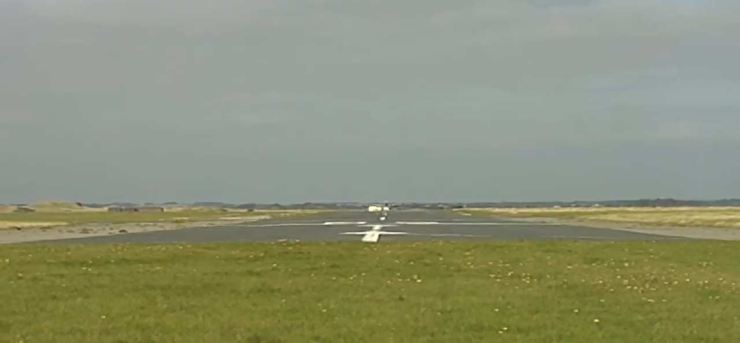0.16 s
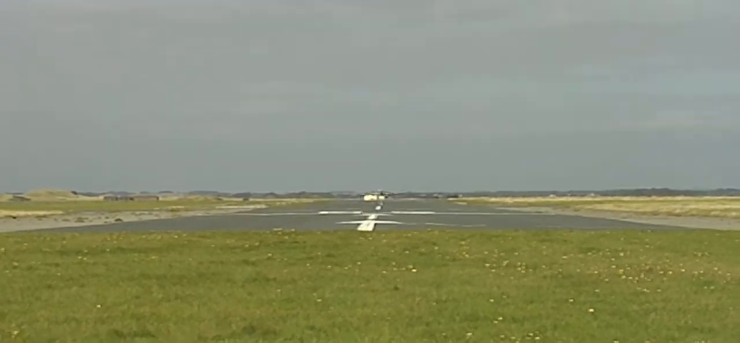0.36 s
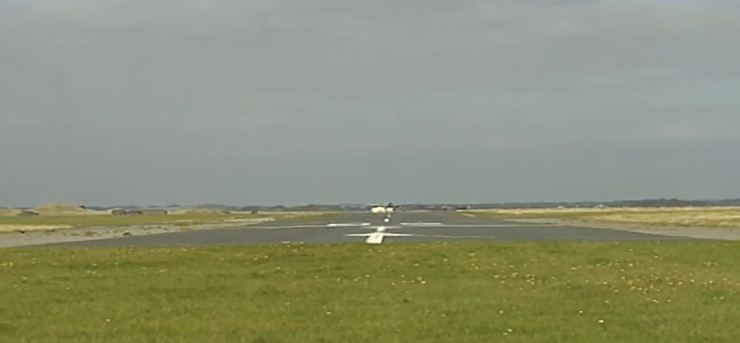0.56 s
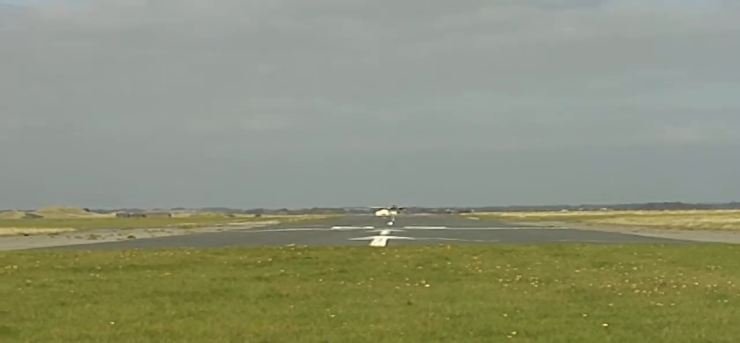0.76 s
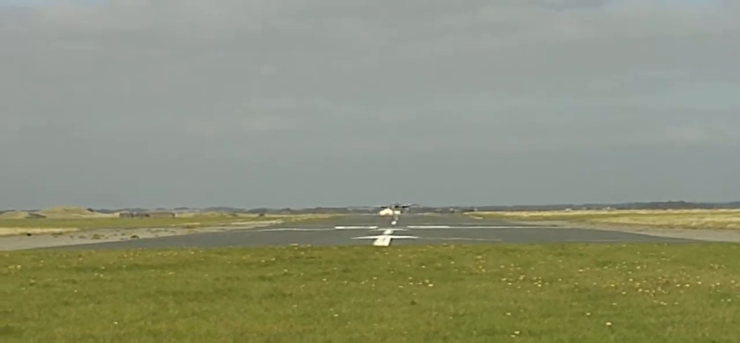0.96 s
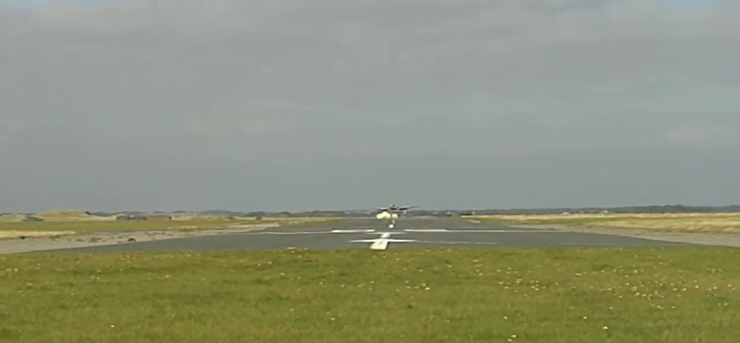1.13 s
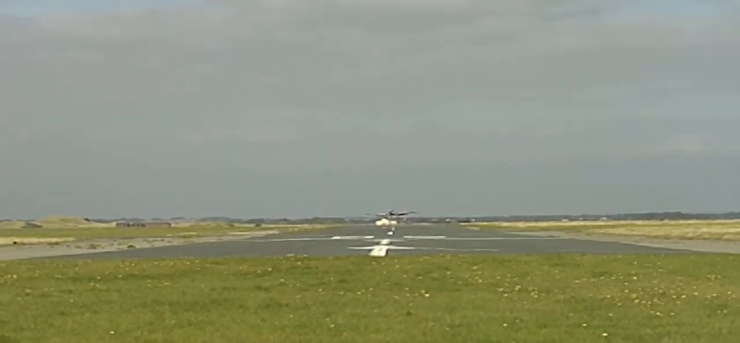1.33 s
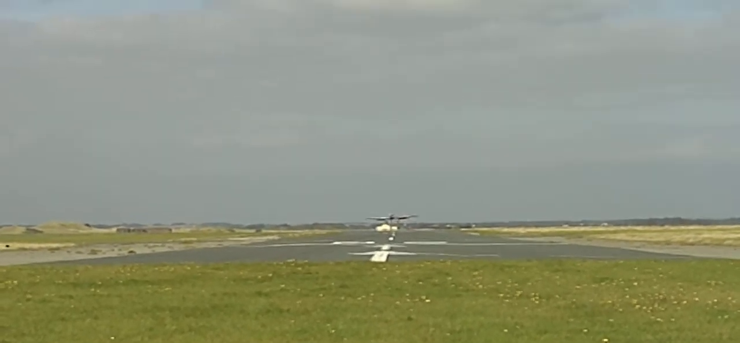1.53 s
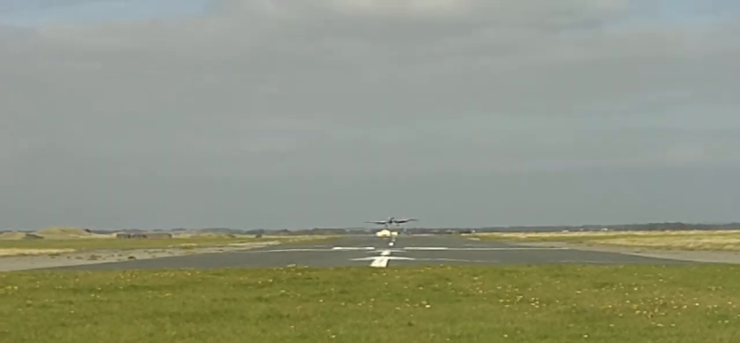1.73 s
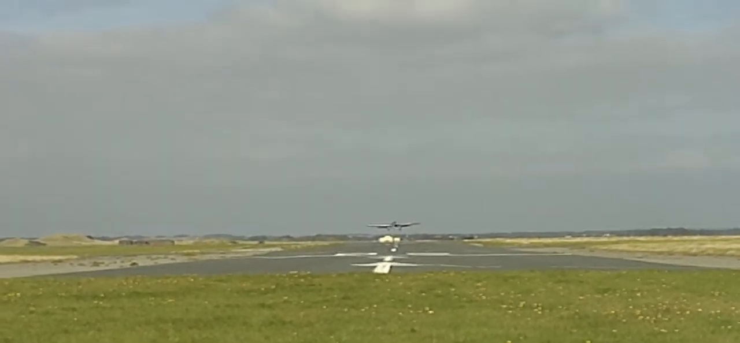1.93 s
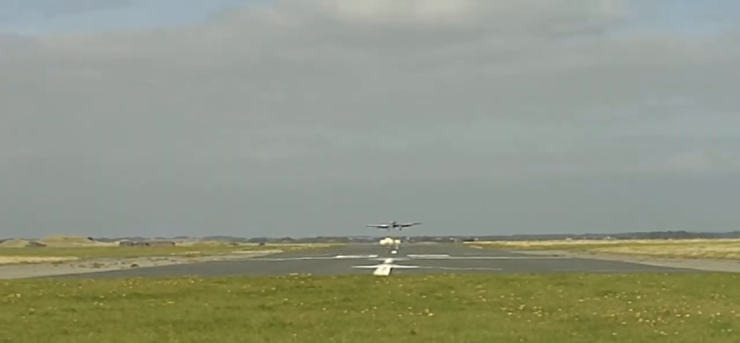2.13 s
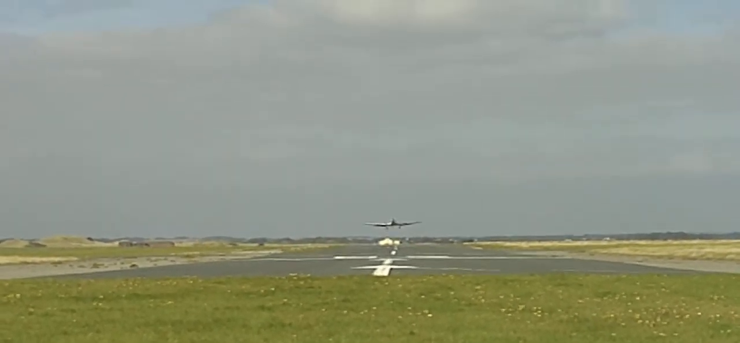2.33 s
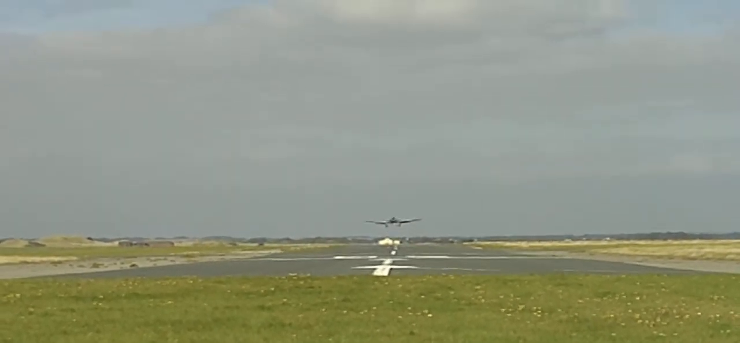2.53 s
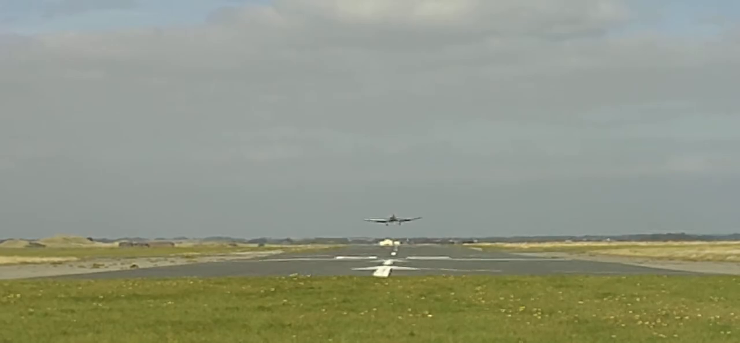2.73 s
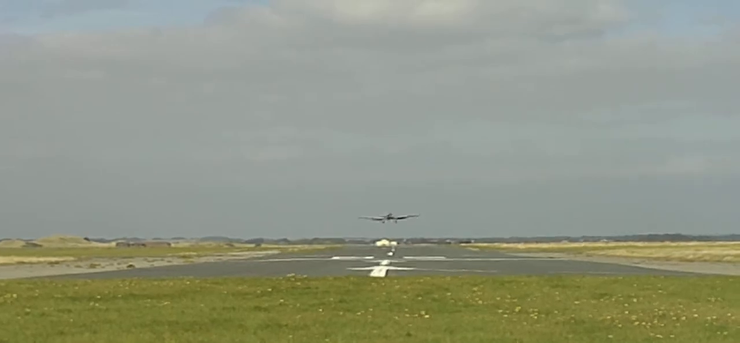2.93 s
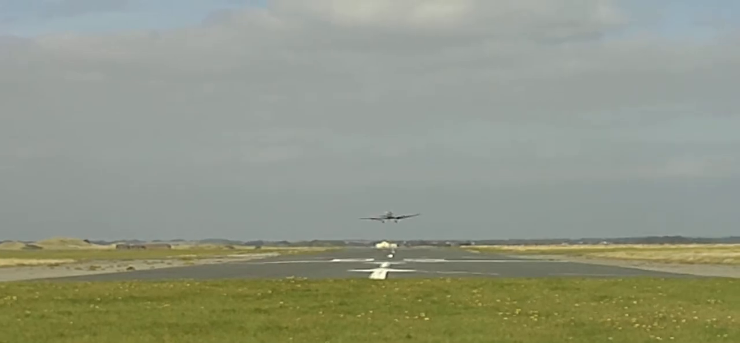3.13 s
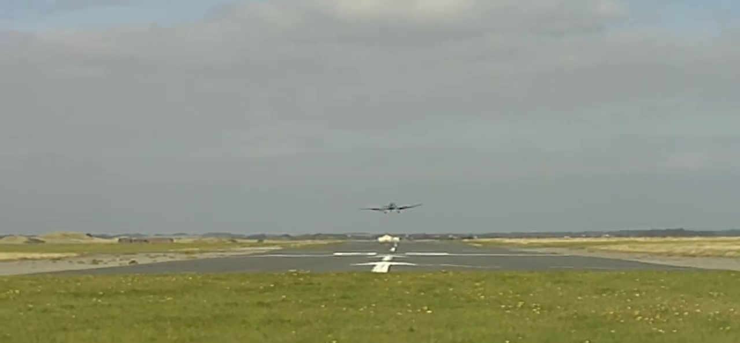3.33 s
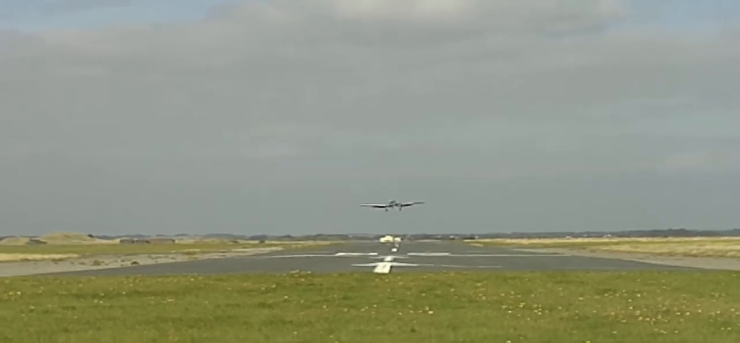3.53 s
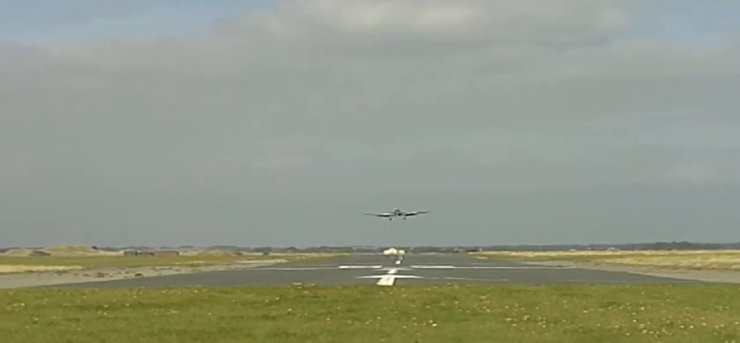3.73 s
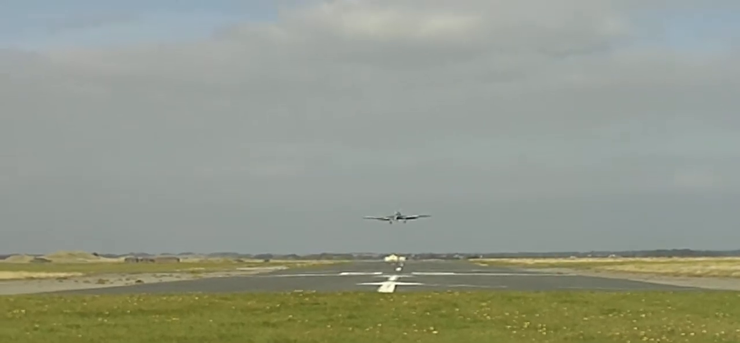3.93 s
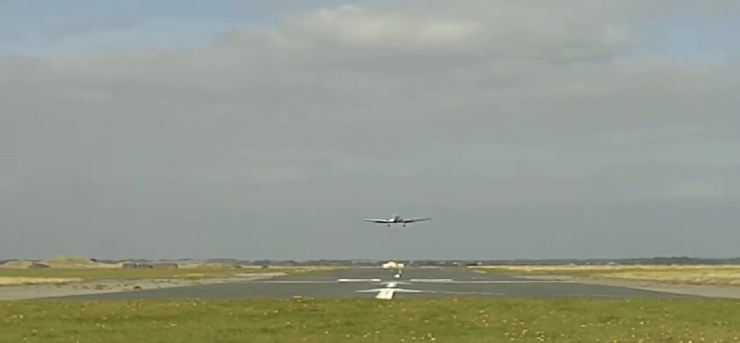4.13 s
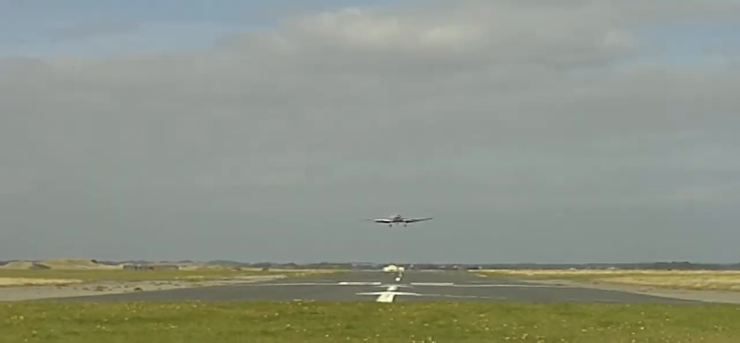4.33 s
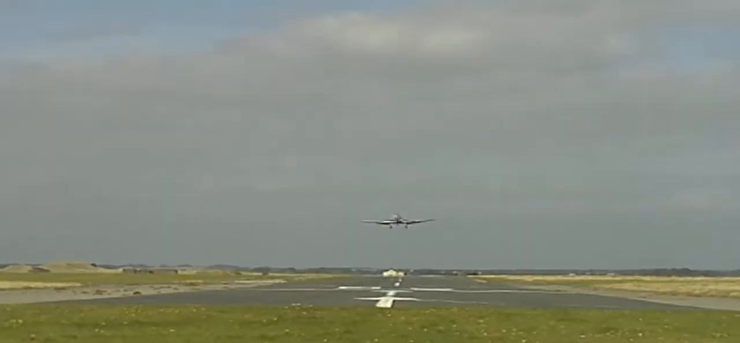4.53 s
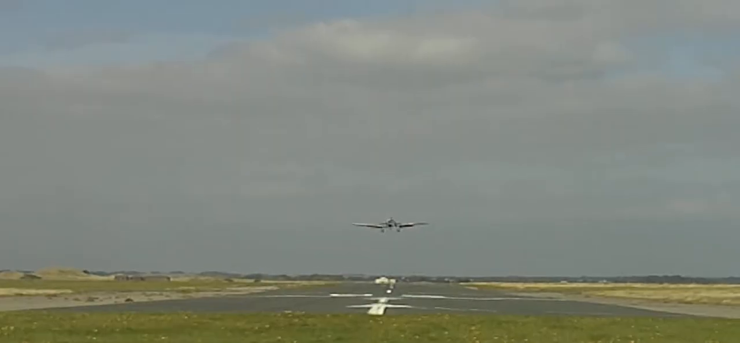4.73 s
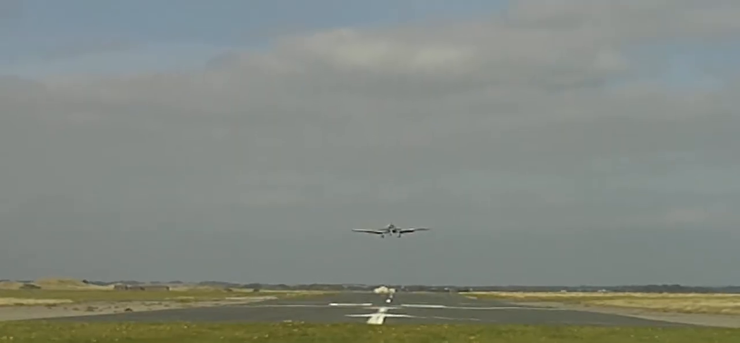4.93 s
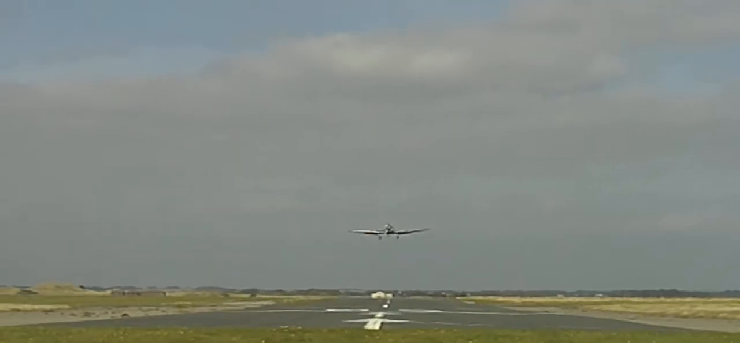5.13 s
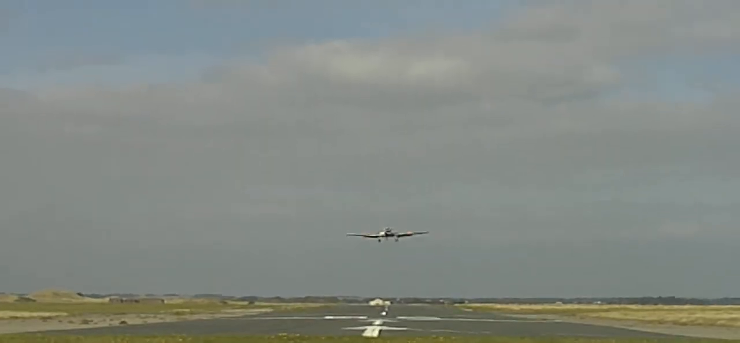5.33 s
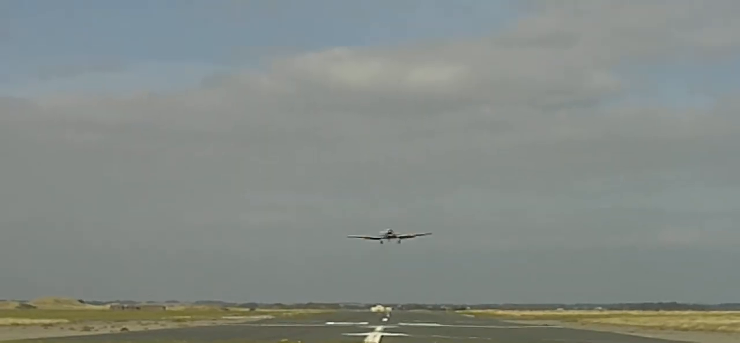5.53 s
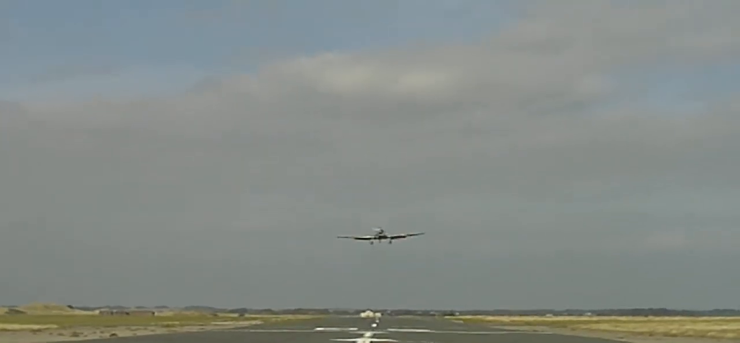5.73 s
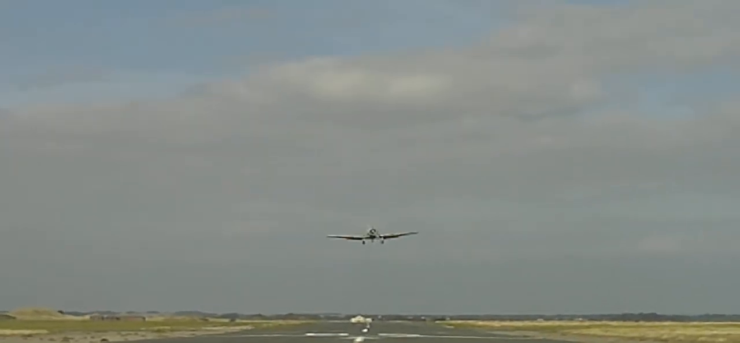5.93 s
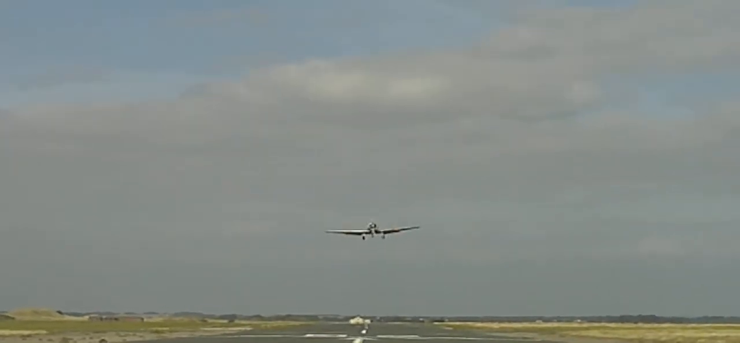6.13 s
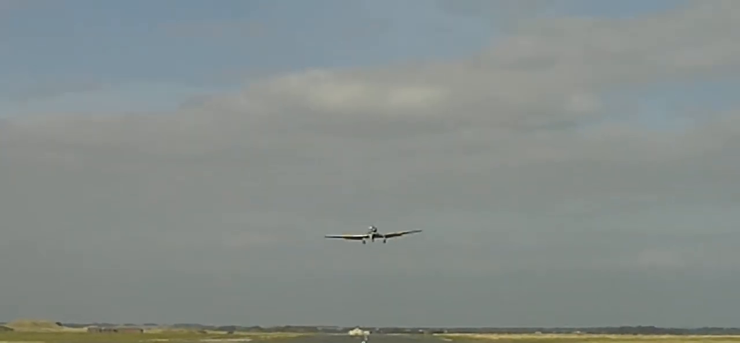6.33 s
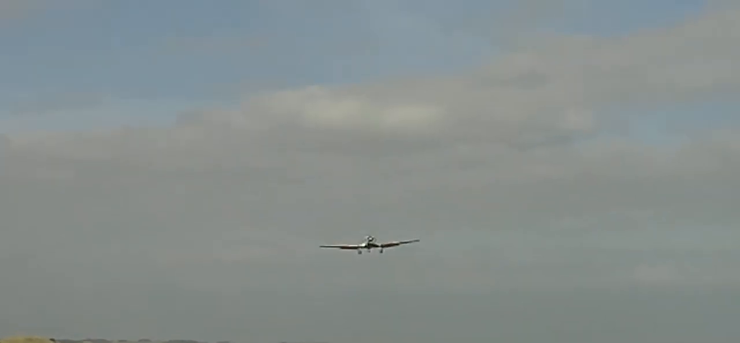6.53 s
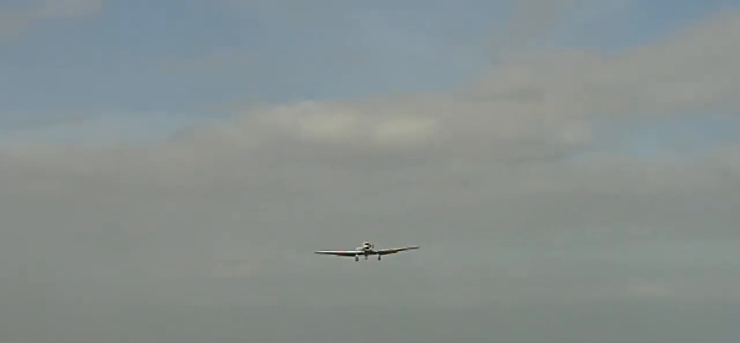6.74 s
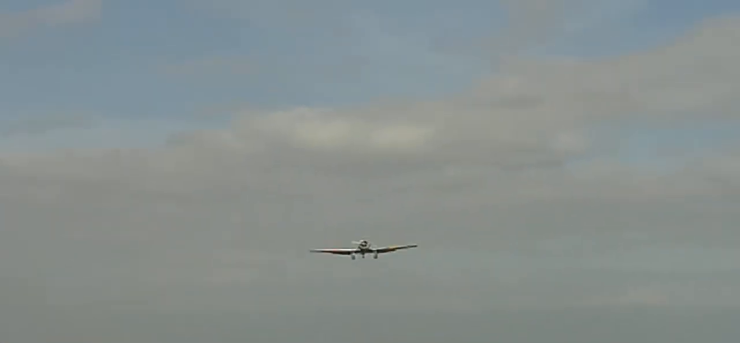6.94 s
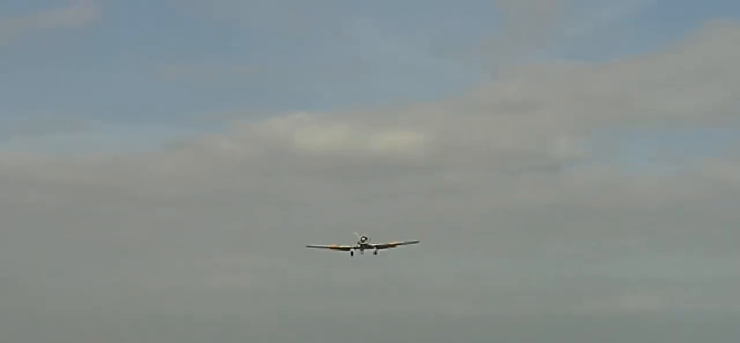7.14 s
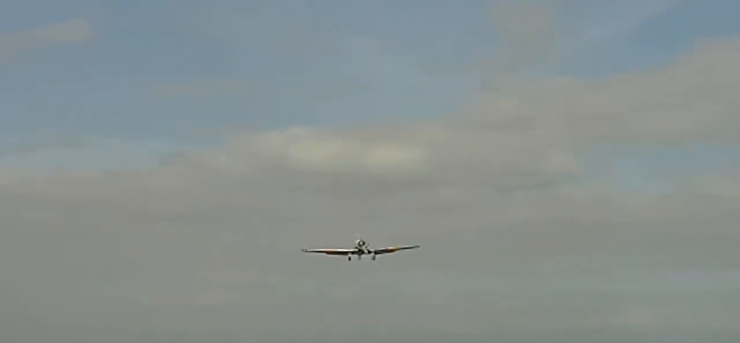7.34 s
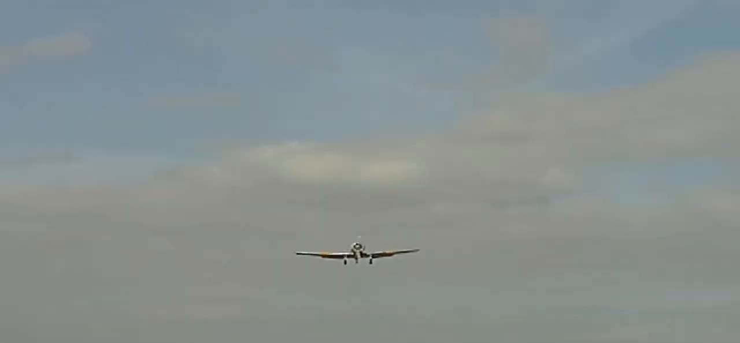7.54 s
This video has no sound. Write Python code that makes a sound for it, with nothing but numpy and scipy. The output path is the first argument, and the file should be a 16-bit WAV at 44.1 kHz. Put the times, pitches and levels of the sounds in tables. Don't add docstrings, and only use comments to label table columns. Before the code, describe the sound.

A propeller aircraft's low, buzzing radial-engine roar swells steadily from distant drone to overloaded close thunder, with light wind and a few camera handling knocks.

```python
import sys
import numpy as np
from scipy import signal
from scipy.fft import rfft, irfft, next_fast_len
from scipy.io import wavfile
from scipy.ndimage import uniform_filter1d

SR = 44100
rng = np.random.default_rng(int(sys.argv[2]) if len(sys.argv) > 2 else 0)


def decibels_to_gain(level_db):
    exponent = np.asarray(level_db, float) / 20
    return 10 ** exponent


def file_out(sig):
    cols = np.atleast_2d(sig).T
    lim = np.clip(cols, -1, 1)
    pcm = np.round(lim * 32767).astype(np.int16)
    wavfile.write(sys.argv[1], SR, pcm)


N = 338247
STEP = 100
CONTROL_S = np.arange(N // STEP + 2) * STEP / SR


def in_time(rows):
    s, *columns = np.transpose(rows)
    return np.array([np.interp(CONTROL_S, s, column) for column in columns])


def at_samples(control):
    return np.interp(np.arange(N) / STEP, np.arange(len(control)), control)


def rms_one(x):
    return x / np.sqrt(np.mean(x ** 2) + 1e-20)


def drift(rate_hz):
    r = np.exp(-2 * np.pi * STEP * rate_hz / SR)
    settle = 1000
    noise = rng.standard_normal(len(CONTROL_S) + settle)
    return rms_one(signal.lfilter([1], [1, -2 * r, r * r], noise)[settle:])


def fades(rows):
    s, half_s, depth_db = np.transpose(rows)
    bells = np.exp(-((CONTROL_S[:, None] - s) / half_s) ** 2)
    return -bells @ depth_db


def between(curves, centres_hz, hz):
    place = np.interp(np.log(hz), np.log(centres_hz), np.arange(len(curves)))
    low = min(int(place), len(curves) - 2)
    return curves[low] + (place - low) * (curves[low + 1] - curves[low])


def noise_bands(colour, count=18):
    size = next_fast_len(N)
    log_hz = np.log(np.arange(size // 2 + 1) * SR / size + 1)
    hz, db = np.transpose(colour)
    shaped = rfft(rng.standard_normal(size)) * decibels_to_gain(np.interp(log_hz, np.log(hz), db))
    shaped *= log_hz > np.log(hz[0]) - 0.3
    shaped /= np.sqrt(np.mean(irfft(shaped, size) ** 2))
    centres = np.geomspace(hz[0], hz[-1], count)
    bands = []
    for centre, one in zip(centres, np.eye(count)):
        window = np.interp(log_hz, np.log(centres), one)
        bands.append((centre, irfft(shaped * window, size)[:N]))
    return bands


def lines(turns, orders, levels_db, starts, curves, centres_hz, flutter_db, wander):
    base_hz = turns[-1] * SR / N
    turns = turns[::10]
    place = np.arange(len(turns)) * 10 / STEP
    out = 0
    for order, level_db, start in zip(orders, levels_db, starts):
        hz = order * base_hz
        shake = 0.16 + (hz / 900) ** 0.5
        gain = decibels_to_gain(level_db + between(curves, centres_hz, hz) + flutter_db * shake * drift(5.0))
        slip = wander * shake * drift(4.3)
        gain, slip = [np.interp(place, np.arange(len(c)), c) for c in (gain, slip)]
        out = out + np.sqrt(2) * gain * np.cos(2 * np.pi * (order * turns + start) + slip)
    return signal.resample_poly(out, 10, 1)[:N]


# time in seconds, buffeting level in dB.
WIND = [
    (0.0, -25.5),
    (0.5, -29.5),
    (1.1, -35.5),
    (1.4, -46),
    (1.96, -35),
    (2.5, -37.5),
    (3.0, -34.5),
]
# frequency in Hz, level in dB per Hz.
FIELD = [(300, -8), (470, -10), (650, -13.5), (900, -5.5), (1440, -17), (1710, -16), (4500, -23),
         (7200, -38)]


def wind():
    port = signal.butter(3, [90, 200], "band", fs=SR, output="sos")
    buffet = rms_one(signal.sosfilt(port, rng.standard_normal(N)))
    lumps = decibels_to_gain(in_time(WIND)[0] - 0.5 + 3.0 * drift(7.2))
    hiss = sum(band * at_samples(decibels_to_gain(0.71 * drift(3.0))) for hz, band in noise_bands(FIELD, count=5))
    return buffet * at_samples(lumps) + decibels_to_gain(-41) * hiss


# start in seconds, hollow knock level in dB, bright snap level in dB.
TICKS = [
    (.058, -26, -46),
    (.277, -27, -44),
    (.3483, -30, -21),
    (.3652, -17, -48),
    (1.368, -23, -39),
    (3.0483, -5, -32),
    (3.329, -17, -41),
    (3.431, -15, -41),
    (3.836, -24, -44),
    (3.8503, -12, -25),
]
# frequency in Hz, level in dB, 60 dB decay in seconds.
HOUSING = [
    (933, 8, 0.0086),
    (1340, -3.5, .01),
    (2040, -0.5, 0.0066),
]
# frequency in Hz, level in dB.
LATCH = [(2700, -10), (3100, 2), (4000, -5), (5500, -3), (7200, -9)]


def ticks():
    at, knock_db, snap_db = np.transpose(TICKS)
    blows, snaps = np.zeros((2, N)) + 1e-18
    blows[(at * SR).astype(int)] = -decibels_to_gain(knock_db)
    snaps[((at + 0.0008) * SR).astype(int)] = decibels_to_gain(snap_db + 5)
    contact = np.hanning(28)
    blows = np.convolve(np.roll(blows, 26), contact / contact.sum())[:N]
    knocks = np.zeros(N)
    for hz, level_db, t60 in HOUSING:
        r, w = decibels_to_gain(-60 / (t60 * SR)), 2 * np.pi * hz / SR
        knocks += signal.lfilter([0, decibels_to_gain(level_db) * np.sin(w)], [1, -2 * r * np.cos(w), r * r], blows)
    too_small_to_boom = signal.butter(4, 700, "high", fs=SR, output="sos")
    knocks = signal.sosfilt(too_small_to_boom, knocks)
    dying = signal.lfilter([1], [1, -decibels_to_gain(-60 / (0.015 * SR))], snaps)
    return knocks + dying * sum(band for hz, band in noise_bands(LATCH, count=2))


# frequency in Hz, level in dB per Hz.
ROAR_COLOUR = [(20, -9.5), (60, 5.5), (200, -5.5), (270, -8.5), (430, -15.5), (650, -5), (800, -9),
               (980, -18), (1450, -14), (1680, -26.5), (2030, -33), (2300, -25.5), (3300, -29),
               (3500, -33.5), (6500, -55)]


def roar(cycles, passes, curves):
    out, shared = np.zeros(N), drift(2.7)
    for hz, band in noise_bands(ROAR_COLOUR):
        patch_db = 0.8 * shared + 0.8 * drift(17.0)
        level_db = between(curves, [70, 300, 650, 1350, 2800], hz)
        out += band * at_samples(decibels_to_gain(level_db + patch_db - 2.5))
    blades, cycle, fifth = np.cos(2 * np.pi * np.array([passes, cycles, 5 * cycles]))
    return out * decibels_to_gain(1.2 * blades + 1.1 * cycle + 0.7 * fifth)


BLADE_DB = [-36, -34.5, -42, -47, -55.5, -33.5, -28.5, -30.5, -31, -32, -47, -44, -49, -39, -47.5, -41.5,
            -43.5, -44, -55.5]
BLADE_LOW_DB = [-2, 7.5, -7.5, 10, -2, -8.5, -9.5, 3, -2.5, -5, 3, 6, 11.5, -5, 0, -3, 5, -2.5, 2]


def propeller(passes, low_db, buzz_db, rasp_db):
    orders = np.arange(len(BLADE_DB)) + 1
    near_ground = in_time([(1.6, 1), (2.9, 0)])
    levels_db = np.c_[BLADE_DB] + np.c_[BLADE_LOW_DB] * near_ground
    return lines(passes, orders, levels_db, rng.random(len(orders)), [low_db, buzz_db, rasp_db],
                 [250, 600, 1300], flutter_db=2.5, wander=0.5)


EXHAUST_DB = [-40, -42.5, -26, -18.5, -28, -29, -23, -23.5, -17.5, -29, -18, -34, -35, -37.5, -31, -30, -33,
              -34, -29, -28.5, -54, -24.5, -40, -36.5, -27.5, -47, -25.5, -29.5, -38.5, -29, -24, -39.5,
              -30, -29, -30.5, -27.5, -39, -41, -38]
RASP_DB = [-49.5, -45, -42, -46, -44.5, -45.5, -44, -44.5, -38.5, -47.5, -46, -55.5, -49]
# centre in seconds, half length in
# seconds, depth in dB (negative: a swell).
BASS_FADES = [(.15, 0.27, 15), (.87, 0.22, 9), (1.55, .2, 2.5), (2.15, .3, -4), (2.67, 0.17, 5.5),
              (3.78, 0.063, 9), (4.04, .1, 4), (4.48, 0.25, 10), (5.07, 0.084, 17), (5.35, .08, 5),
              (5.9, 0.26, 6.5), (6.3, 0.23, 4.5), (6.85, 0.13, 7.5), (7.55, 0.35, 3)]
# centre in seconds, half length in seconds, depth in dB.
FIRING_FADE = [(.4, .7, 9)]


def engine(cycles, low_db, high_db):
    orders = np.r_[1:len(EXHAUST_DB) + 1, 47:47 + 2 * len(RASP_DB):2]
    pulse_starts = (orders == 8) / 2 - (orders - 9) ** 2 / 25
    starts = np.where(orders > 11, rng.random(len(orders)), pulse_starts)
    levels_db = list(EXHAUST_DB) + list(RASP_DB)
    levels_db[3] = -14.5 + fades(BASS_FADES)
    levels_db[8:11] = [db + fades(FIRING_FADE) for db in levels_db[8:11]]
    return lines(cycles, orders, levels_db, starts, [low_db, high_db], [230, 480], flutter_db=2.0, wander=0.55)


# time in seconds, engine cycles per second, blade passes per second.
SPEED = [(0.0, 20.886, 83.58), (0.5, 20.886, 83.65), (1.4, 21.14, 84.18), (1.75, 21.43, 85.15),
         (2.25, 21.51, 85.45), (2.95, 21.19, 83.62), (3.5, 21.145, 83.42), (4.1, 21.29, 83.82),
         (4.4, 21.31, 83.98), (5.3, 21.198, 83.42), (5.9, 21.232, 83.82), (6.8, 21.304, 83.81),
         (7.67, 21.304, 83.78)]
# time in seconds, nearness in dB, lift in dB by the ground echo as the path opens.
APPROACH = [(0.0, -31, 14.5), (0.6, -28, 11.5), (1.2, -28, 12), (2.0, -24, 8.5), (2.5, -23, 0),
            (3.1, -18.5, 0.5), (3.6, -15, -2.5), (4.2, -12, -3.5), (4.6, -11.5, -6.5), (5.2, -7, -5),
            (5.5, -5.5, 2.5), (5.9, -4, 7), (6.3, -2.5, 2.5), (6.65, -2, -0.5), (6.9, 0.5, -2.5),
            (7.1, 2.5, -3), (7.4, 5, -0.5), (7.67, 5.5, 2)]
# centre in seconds, half length in seconds, depth in dB.
BUZZ_FADES = [(.4, 0.095, 12), (1.4, 0.087, 15), (2.1, 0.42, 20), (2.85, 0.17, 7), (3.95, 0.35, 4),
              (5.15, .15, 2), (6.35, .15, 8), (6.8, 0.17, 14)]


def scene():
    cycles, passes = [np.cumsum(at_samples(speed)) / SR for speed in in_time(SPEED)]
    near_db, lift_db = in_time(APPROACH)
    bass_dips, buzz_dips = fades(BASS_FADES), fades(BUZZ_FADES)

    lead_db, knee_db = 9, 2.5
    low_db = -knee_db * np.log1p(np.exp(-(near_db + lead_db) / knee_db))
    buzz_db = 0.1 + 0.61 * near_db + 0.3 * lift_db + buzz_dips
    blade_rasp_db = 0.17 + 0.93 * near_db + 1.1 * lift_db

    rumble_db = -16 + 0.51 * low_db + 0.6 * bass_dips + 1.5 * drift(4.0)
    chest_db = -12.5 + 0.66 * near_db + 0.13 * lift_db
    body_db = -10 + 0.97 * near_db - 0.09 * lift_db + 0.25 * buzz_dips
    rasp_db = -11.5 + near_db + 0.9 * lift_db
    hiss_db = -12 + near_db - 0.058 * lift_db

    aircraft = engine(cycles, low_db, near_db)
    aircraft = aircraft + roar(cycles, passes, [rumble_db, chest_db, body_db, rasp_db, hiss_db])
    aircraft = aircraft + propeller(passes, low_db, buzz_db, blade_rasp_db)
    return (aircraft + wind() + ticks())[None]


# frequency in Hz, step in dB over the surrounding lines, growth in dB per dB of loudness.
COARSE_STEP = [(300, -25, 0), (1200, -8, .3), (1800, -4, .3), (2050, 3, .4), (3200, 3, .35), (3700, 7, .3),
               (5000, 10, .1), (7300, 9, -.1), (7900, 22, -.4)]


def camera_rounding(x, size=1152):
    padded = np.pad(x, (size, 2 * size - len(x) % size))
    frames = np.lib.stride_tricks.sliding_window_view(padded, 2 * size)[::size].copy()
    n, k = np.arange(2 * size)[:, None], np.arange(size * 15200 // SR)
    window = np.sqrt(2 / size) * np.sin(np.pi * (n + 0.5) / (2 * size))
    basis = window * np.cos(np.pi / size * (n + 0.5 + size / 2) * (k + 0.5))
    lines_now = frames @ basis
    around = uniform_filter1d(uniform_filter1d(lines_now ** 2, size=45, axis=1), size=3, axis=0)
    by_band = rng.standard_normal((len(frames), len(k) // 10 + 1))
    by_band = np.repeat(by_band, 10, axis=1)[:, :len(k)]
    loud_db = 10 * np.log10(np.mean(frames ** 2, axis=1, keepdims=True) + 1e-9)
    hz, *columns = np.transpose(COARSE_STEP)
    over_db, follows = [np.interp(k * SR / 2 / size, hz, column) for column in columns]
    step_db = over_db + follows * (loud_db + 18) + 2.0 * by_band
    step = decibels_to_gain(step_db) * np.sqrt(np.abs(around)) + 1e-9
    back = (np.round(lines_now / step) * step) @ basis.T
    return (back[1:, :size] + back[:-1, size:]).ravel()[:len(x)]


SHORT_FRAMES = [2.85, 4.22, 4.92]


def camera(heard):
    preamp_top = 1.9
    rounded = preamp_top * np.tanh(heard / preamp_top)
    narrow = signal.sosfilt(signal.cheby2(10, 60, 8100, fs=SR, output="sos"), rounded)
    sudden_s = [s for s, knock_db, snap_db in TICKS if snap_db > -43]
    gap_s = np.abs(CONTROL_S[:, None] - np.r_[sudden_s, SHORT_FRAMES]).min(axis=1)
    exact = at_samples(np.clip(2 - gap_s / 0.012, 0, 1))
    coarse = np.sqrt(1 - exact)
    return exact * narrow + coarse * camera_rounding(coarse * narrow)


def low_pass(x):
    return signal.sosfilt(signal.butter(12, 16000, fs=SR, output="sos"), x)


def record(dry):
    mix = np.clip(camera(dry[0]), -1, 1)[None]
    return low_pass(mix)


dry = scene()
out = record(dry)
file_out(out)
```